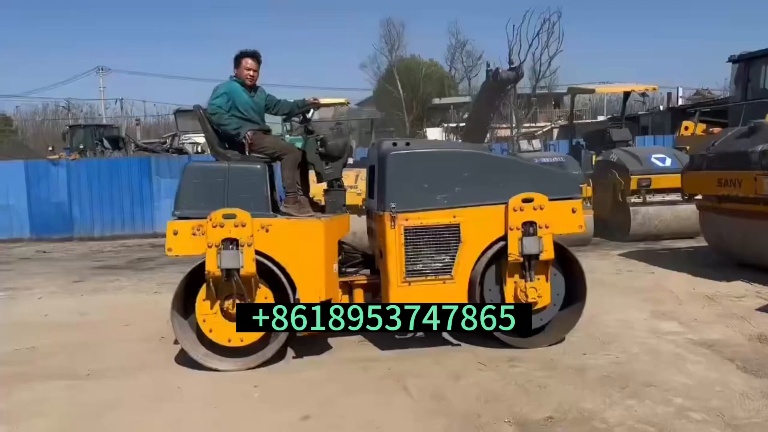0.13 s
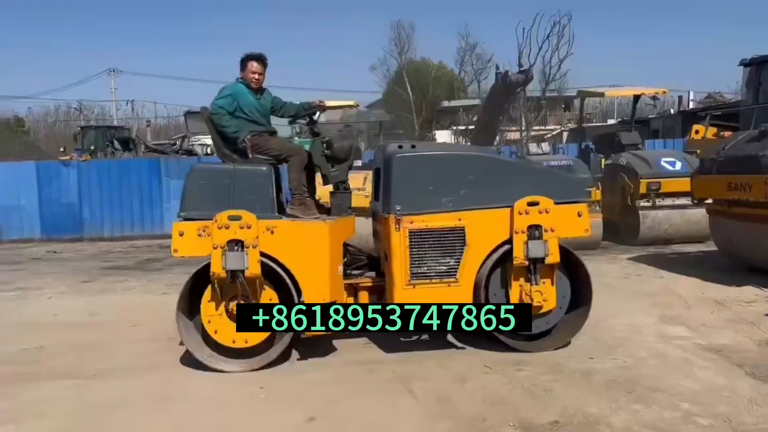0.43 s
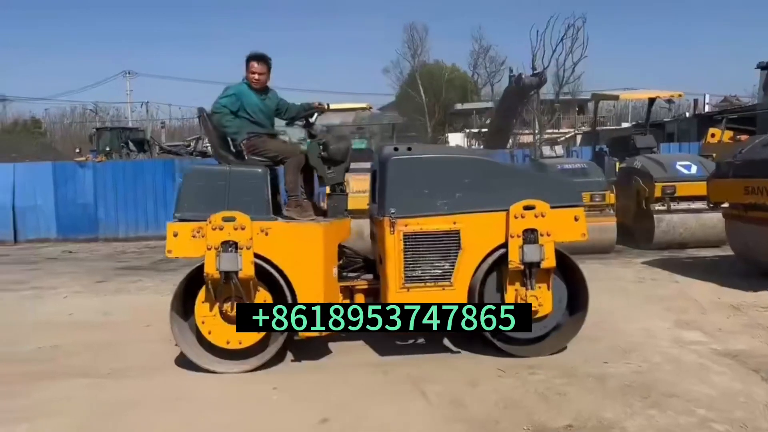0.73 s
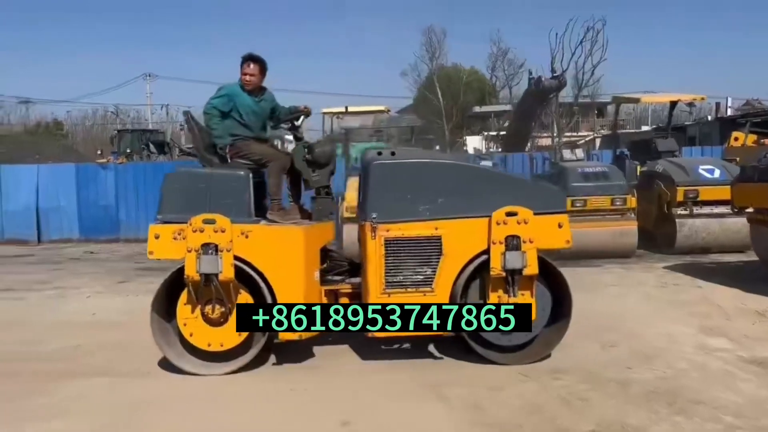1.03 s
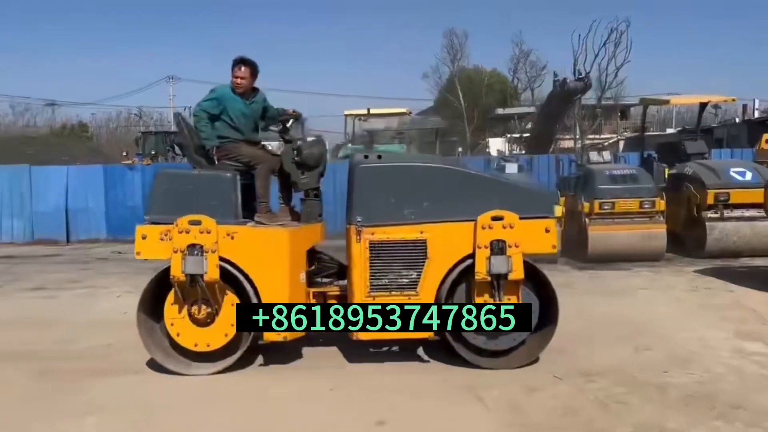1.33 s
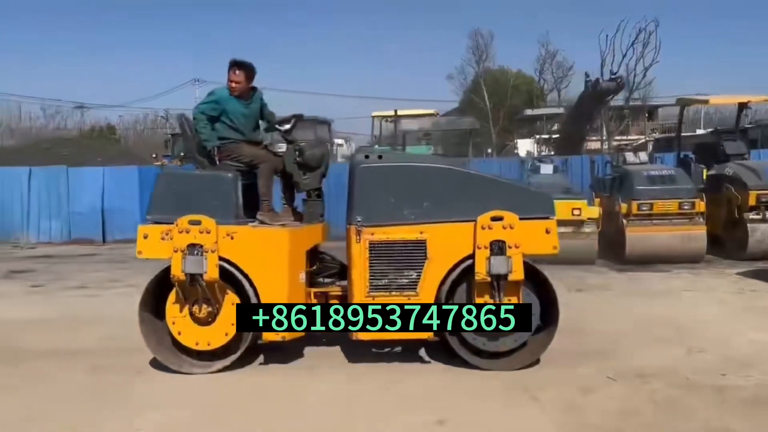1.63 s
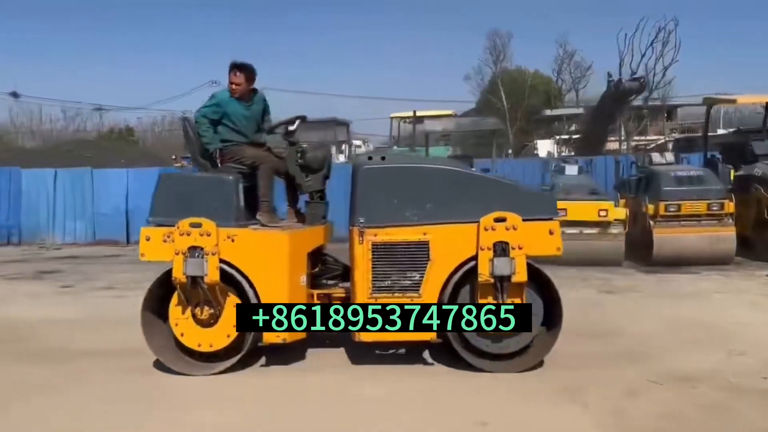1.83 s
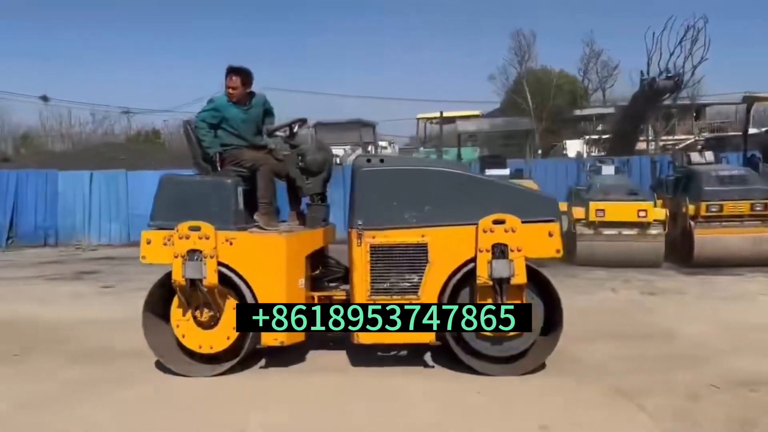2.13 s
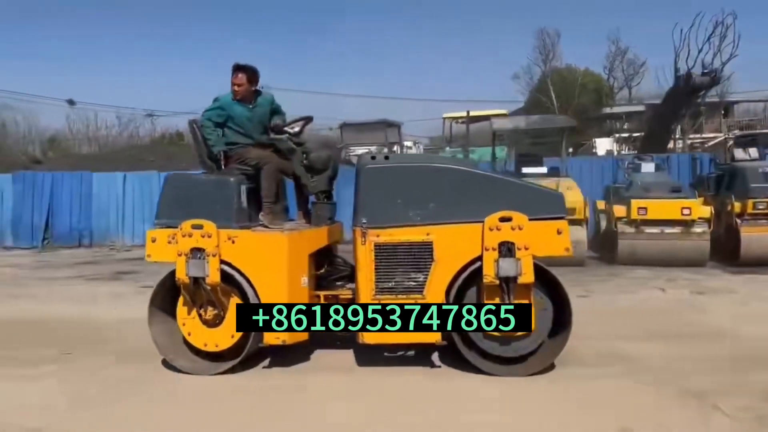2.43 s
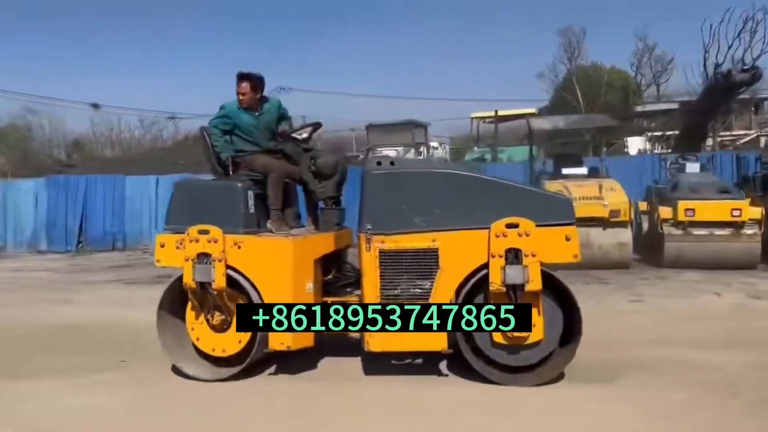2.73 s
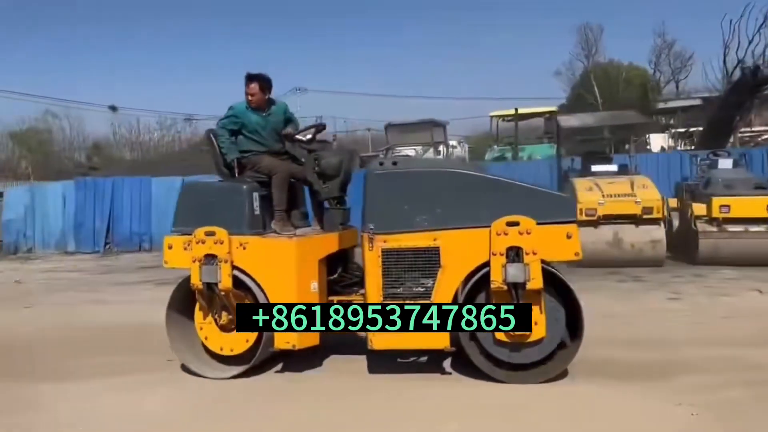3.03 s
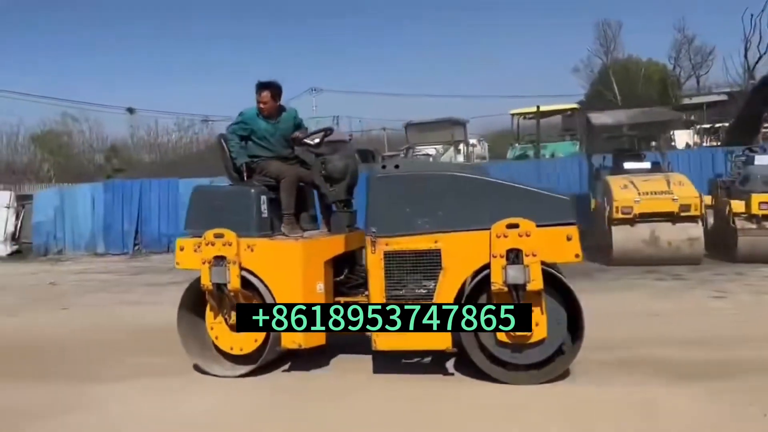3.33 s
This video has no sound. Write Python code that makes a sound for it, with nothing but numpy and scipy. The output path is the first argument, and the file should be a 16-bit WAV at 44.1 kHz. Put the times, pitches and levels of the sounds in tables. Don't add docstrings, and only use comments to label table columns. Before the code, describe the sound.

Low throbbing diesel engine of a road roller with metallic clatter, drum rumble and crunching stones

```python
import sys
import numpy as np
from scipy import signal
from scipy.fft import rfft, irfft, next_fast_len
from scipy.io import wavfile
from scipy.ndimage import uniform_filter1d, map_coordinates

SR = 44100
rng = np.random.default_rng(int(sys.argv[2]) if len(sys.argv) > 2 else 0)


def ratio_of_db(decibels):
    return 10 ** (np.asarray(decibels, float) / 20)


def generate_wav(signal):
    frames = np.transpose(np.atleast_2d(signal))
    scaled = np.clip(frames, -1, 1) * 32767
    pcm = np.round(scaled).astype(np.int16)
    wavfile.write(sys.argv[1], SR, pcm)


N = 153909

# time in seconds, firings per second.
ENGINE_SPEED = [(.1, 59.3), (.35, 60), (.5, 58.8), (.65, 57), (.9, 57.2), (1.1, 58.5), (1.25, 59),
                (1.45, 59.8), (1.6, 59.2), (1.9, 59), (2.2, 59.6), (2.7, 59.6), (3.49, 59.2)]
# time in seconds, load from 0 to 1, exhaust boom in dB, drum rumble in dB.
DRIVE_LOAD = [(.08, 0.1, -13, -10), (.18, 0.26, 0, 6), (.45, 0.37, -1.5, -1), (.55, 0.99, 1.5, -5),
              (1.08, 0.78, 3.5, -3.5), (1.2, 0.62, 1, 1.5), (1.5, 0.3, 1, -1), (1.75, 0.36, 0.5, 0),
              (2.1, 0.26, -4, 1), (2.45, 0, -9.5, -1), (2.65, 0, 2.5, 1), (3.05, 0.05, -7, 1),
              (3.4, 0.13, 3.5, 3)]
# time in seconds, level in dB.
CLATTER_LEVEL = [(0.09, -19.5), (0.28, -24.5), (0.75, -22), (1.13, -23.5), (1.18, -26.5), (1.55, -23.5),
                 (2.19, -25), (2.2, -23.5), (2.52, -25), (2.66, -24), (3.47, -25), (3.49, -25)]
# multiple of the firing rate, level at idle in dB, dB gained under full load.
EXHAUST_TONES = [
    (.75, -39, -34),
    (1, -20.5, -3.5),
    (1.25, -29, -15),
    (2.0, -41.5, 21),
    (2.25, -37, -21),
    (3, -34, 7.5),
    (4.3, -39, 9),
    (6, -40, 3.5),
]
CYLINDER_KNOCK = [0, -3, -1, 2]
# pitch in Hz, width in Hz, level in dB, dB change as it draws away,
# dB gained under full load, strength of a clear tone beside the noise.
BLOCK_RINGS = [
    (1730, 175, -2.5, 3, -4, 1.7),
    (3307, 440, -7.5, -0.5, 8, 0.15),
    (2796, 440, -16.5, 0, 13, 0),
    (2055, 190, -12.5, 1, 7.5, 0.11),
    (4700, 1100, -19, -5, 10.5, 0),
]
# dB for the four cylinders, one row per ring above.
RING_CYLINDERS = [
    [2, -9, .5, 3.5],
    [2.5, -3, 1, 1.5],
    [0, 2, -2, 0],
    [2, -2, 0, 1],
    [2, -3, 0, 1],
]
# pitch in Hz, level in dB.
CLATTER_COLOUR = [(150, -1), (250, -6.5), (435, -8), (980, -11.5), (1130, -14.5), (1730, -9.5),
                  (2330, -13.5), (3330, -16), (7500, -31.5), (9750, -100), (16500, -120)]
# pitch in Hz, level in dB.
HISS_COLOUR = [(3820, -57), (6500, -8), (7960, 4.5), (9130, 4.5), (10500, 5.5), (11300, 5.5), (13900, 2)]
# pitch in Hz, width in Hz, height in dB.
PANELS_NEAR = [(535, 43, 5), (614, 80, -2), (739, 99, 6.5), (1008, 97, 4), (1135, 42, -8), (1480, 88, 3.5),
               (2010, 67, 2.5), (3460, 110, 0)]
# pitch in Hz, width in Hz, height in dB.
PANELS_FAR = [(524, 54, 7), (580, 49, -7.5), (801, 30, 7), (1090, 320, 1.5), (1553, 68, -20),
              (2990, 150, 3), (5100, 310, 4)]
# pitch in Hz, level in dB.
RUMBLE_COLOUR = [(13, -35), (22, -35), (43, 1), (65, 7.5), (108, -3), (296, -7), (347, -5.5), (416, -16.5),
                 (500, -14), (650, -12.5), (1100, -120)]
# time in seconds, level in dB.
CRUSHED_STONES = [(0.384, -34), (.456, -56), (0.611, -36), (.714, -35), (0.783, -26.5), (0.842, -37),
                  (.924, -38), (1.722, -26), (1.875, -33), (2.027, -38), (2.101, -39), (2.18, -37),
                  (2.29, -38)]
# pitch in Hz, level in dB.
STONE_COLOUR = [(800, -40), (2500, -3), (6000, 4.5), (8500, -4.5), (11000, 2), (14000, -27)]
# time in seconds, level in dB.
LOW_THUMPS = [(0.378, -23), (.719, -16), (.79, -15.5), (0.842, -18), (.929, -14), (1.69, -18), (1.745, -13),
              (1.8, -16), (2.092, -18), (2.229, -16), (2.845, -27)]
# time in seconds, pitch in Hz, level in dB.
PUMP_WHINE = [
    (.3, 1370, -59),
    (.6, 1371, -41),
    (.9, 1365, -42),
    (1.1, 1366, -44),
    (1.6, 1350, -45),
    (1.9, 1340, -62),
]
# pitch in Hz, readiness of a narrow band to drop, in spreads.
BAND_DROPOUT = [(1300, -2.6), (3500, -2.1), (4400, -1.8), (5200, -2.2), (5800, -1.5), (6500, -2),
                (7400, -1.6), (9800, -1.2), (11000, -1.5), (12400, -.9), (13400, -.3), (14100, .8)]
# pitch in Hz, readiness to drop, in spreads.
VALLEY_DROPOUT = [(7400, -3), (7700, -.4), (8300, .2), (8800, .8), (9150, 1.3), (9450, 1.9), (9750, -.1),
                  (10200, -2), (10500, -9)]
# pitch in Hz, limit in dB relative to the sound around that pitch.
DETAIL_LIMIT = [(2500, -14.5), (6000, -4), (9000, -14), (14000, 3.5)]
# start in seconds, end in seconds.
THIN_STRETCHES = [(.2, .45), (.49, .54), (.65, .75), (.97, 1.0), (1.2, 1.31), (1.36, 1.44), (1.51, 1.61),
                  (1.75, 1.9), (1.95, 1.99), (2.12, 2.22), (2.33, 2.45), (2.66, 2.7), (2.78, 2.88),
                  (2.9, 3.0), (3.02, 3.21), (3.23, 3.29), (3.32, 3.46)]


def seconds():
    return np.arange(N) / SR


def unit(x):
    return x / np.sqrt(np.mean(x ** 2) + 1e-20)


def curves(rows):
    s, *cols = np.transpose(rows)
    return [np.interp(seconds(), s, c) for c in cols]


def wobble(rate):
    knots = rng.standard_normal(int(N * 40 / SR) + 4)
    return map_coordinates(knots, [np.arange(N) * min(rate, 40) / SR])


def filtered(x, response):
    m = next_fast_len(N + SR // 2)
    return irfft(rfft(x, m) * response(np.fft.rfftfreq(m, 1 / SR)), m)[:N]


def colour(points):
    f, v = np.transpose(points)
    return lambda hz: ratio_of_db(np.interp(np.log(hz + 1), np.log(f + 1), v))


def bumps(rows):
    return lambda hz: ratio_of_db(sum(db / (1 + (2 * (hz - c) / w) ** 2) for c, w, db in rows))


def noise(patchy_db):
    z = signal.stft(rng.standard_normal(N + 512), nperseg=512)[2]
    field = uniform_filter1d(rng.standard_normal(z.shape), size=5, axis=0)
    field = uniform_filter1d(field, size=10, axis=1)
    return signal.istft(z * ratio_of_db(patchy_db * unit(field)), nperseg=512)[1][:N]


def pump():
    hz, db = curves(PUMP_WHINE)
    turns = np.cumsum(hz + 14 * wobble(30)) / SR
    return ratio_of_db(db + 3.5 * wobble(22)) * np.sin(2 * np.pi * turns)


def drum_rumble():
    level_db = -23 + curves(DRIVE_LOAD)[2] + 0.44 * wobble(5.8)
    return ratio_of_db(level_db) * unit(filtered(noise(1.8), colour(RUMBLE_COLOUR)))


def stones():
    rise_s, fade_s = .0012, .009
    t = seconds()
    bursts = sum(ratio_of_db(db) * np.exp(-np.abs(t - s) / np.where(t > s, fade_s, rise_s)) for s, db in CRUSHED_STONES)
    grain_db = 1.3 * np.repeat(rng.standard_normal(N // 64 + 1), 64)[:N]
    grains = rng.standard_normal(N) * ratio_of_db(grain_db)
    return bursts * unit(filtered(grains, colour(STONE_COLOUR)))


def thumps():
    pitch_hz, peak_s = 115, .006
    drops = np.array(LOW_THUMPS)
    t = np.clip(seconds() - drops[:, :1], 0, None)
    swell = t / peak_s * np.exp(1 - t / peak_s)
    return np.sum(ratio_of_db(drops[:, 1:]) * np.sin(2 * np.pi * pitch_hz * t) * swell, axis=0)


def firings():
    rate = curves(ENGINE_SPEED)[0] * (1 + 0.0012 * wobble(6))
    return np.cumsum(rate) / SR + 3.95


def exhaust(count):
    load, boom_db, _ = curves(DRIVE_LOAD)
    count = count - .65
    tones = []
    for k, db, gain_db in EXHAUST_TONES:
        level = ratio_of_db(db + gain_db * load + 1.1 * wobble(8.73))
        drift = .2 * np.sqrt(k) * wobble(9.7)
        tones.append(level * np.sin(2 * np.pi * k * count + drift))
    bark = 1 + .3 * np.cos(np.pi / 2 * count + 3.1)
    return -np.sqrt(2) * (ratio_of_db(boom_db) * sum(tones[:3]) + bark * sum(tones[3:]))


def knock(count, decay_s, pattern_db):
    rise_s, scatter_db = .0015, 1.2
    k = count.astype(int)
    size_db = np.array(pattern_db)[k % 4] + scatter_db * rng.standard_normal(N // 400)[k]
    t = (count - k) / curves(ENGINE_SPEED)[0]
    return unit(ratio_of_db(size_db) * np.exp(-t / decay_s) * (1 - np.exp(-t / rise_s)))


def distance():
    middle_s, lasts_s = 1.6, 0.7
    return np.clip((seconds() - middle_s) / lasts_s + .5, 0, 1)


def panel_rattle(count):
    share = 0.23
    pulses = share * knock(count, 0.008, CYLINDER_KNOCK) + 1 - share
    body = unit(filtered(noise(0.99) * pulses, colour(CLATTER_COLOUR)))
    away = distance()
    return (1 - away) * filtered(body, bumps(PANELS_NEAR)) + away * filtered(body, bumps(PANELS_FAR))


def engine_hiss(count):
    pulses = 0.15 * knock(count, .004, CYLINDER_KNOCK) + 0.68
    return unit(filtered(noise(0.74) * pulses, colour(HISS_COLOUR))) * ratio_of_db(1.3 * wobble(12))


def block_ring(count):
    load, away = curves(DRIVE_LOAD)[0], distance()
    total = 0
    for (c, w, db, away_db, load_db, clear), pattern in zip(BLOCK_RINGS, RING_CYLINDERS):
        tone = np.cos(2 * np.pi * c * seconds() + 2.44 * wobble(30))
        struck = (noise(0.64) + clear * tone) * knock(count, 0.0059, pattern)
        ring = filtered(struck, lambda f: (1j * f * w / (c * c - f * f + 1j * f * w)) ** 2)
        total = total + ratio_of_db(db + away_db * away + load_db * load) * unit(ring)
    return total


def clatter(count):
    level = ratio_of_db(curves(CLATTER_LEVEL)[0] + 0.13 * wobble(14))
    return level * (1.076 * panel_rattle(count) + ratio_of_db(-10) * block_ring(count) + ratio_of_db(-19) * engine_hiss(count))


def scene():
    count = firings()
    ground = drum_rumble() + stones() + thumps()
    return (pump() + ground + exhaust(count) + clatter(count))[None]


def thinned(x):
    hz, s, z = signal.stft(x, SR, nperseg=2048)
    frames = z.shape[1]
    band = np.arange(len(hz)) // 8
    luck = rng.standard_normal((band[-1] + 1, frames))
    luck = unit(uniform_filter1d(luck, size=3, axis=1))[band]
    loud = np.log(np.mean(np.abs(z[(hz > 4000) & (hz < 7500)]) ** 2, axis=0) + 1e-12)
    loud = np.clip((loud - np.median(loud)) / .3, -2, 3)
    thin = sum((s > a) & (s < b) for a, b in THIN_STRETCHES)
    thin = np.convolve(thin, [.2, .6, .2], 'same')
    ragged = rng.standard_normal((band[-1] // 2 + 1, frames))
    ragged = unit(uniform_filter1d(ragged, size=4, axis=1))[band // 2]
    block = 1.3 - 2.1 * thin + .25 * rng.standard_normal(frames) + .2 * loud + .5 * ragged

    def level(rows):
        return np.interp(hz, *np.transpose(rows), left=-99, right=rows[-1][1])[:, None]

    local = np.sqrt(np.abs(uniform_filter1d(np.abs(z) ** 2, size=24, axis=0)))
    detailed = np.abs(z) > local * ratio_of_db(level(DETAIL_LIMIT))
    keep = (luck > level(BAND_DROPOUT)) & (block > level(VALLEY_DROPOUT)) & detailed
    return signal.istft(z * keep, SR, nperseg=2048)[1][:N]


def low_pass(x):
    return signal.sosfilt(signal.butter(12, 14030, fs=SR, output="sos"), x)


def record(dry):
    low_cut_hz, top_hz = 33.7, 14150
    start_s, rise_s, dip_db, settle_s = 0.079, 0.0053, -6.5, 0.14
    banded = filtered(dry[0], lambda hz: (hz < top_hz) * hz ** 2 / (hz ** 2 + low_cut_hz ** 2))
    t = np.clip(seconds() - start_s, 0, None)
    opening = np.clip(t / rise_s, 0, 1) ** 2 * ratio_of_db(dip_db * np.exp(-t / settle_s))
    mix = thinned(banded) * opening
    return low_pass(mix[None])


dry = scene()
out = record(dry)
generate_wav(out)
```